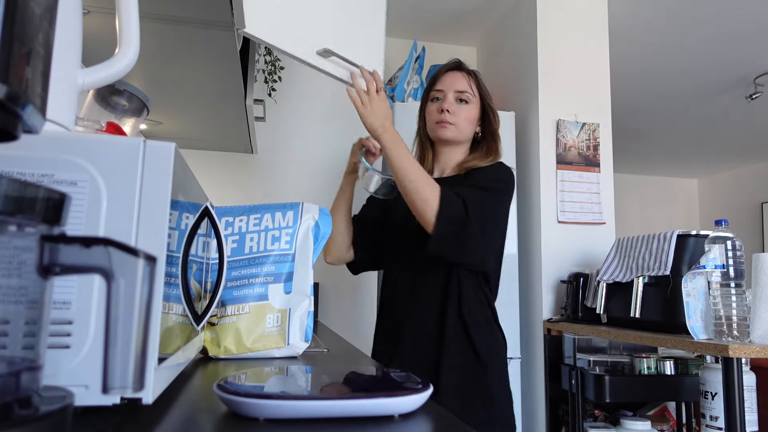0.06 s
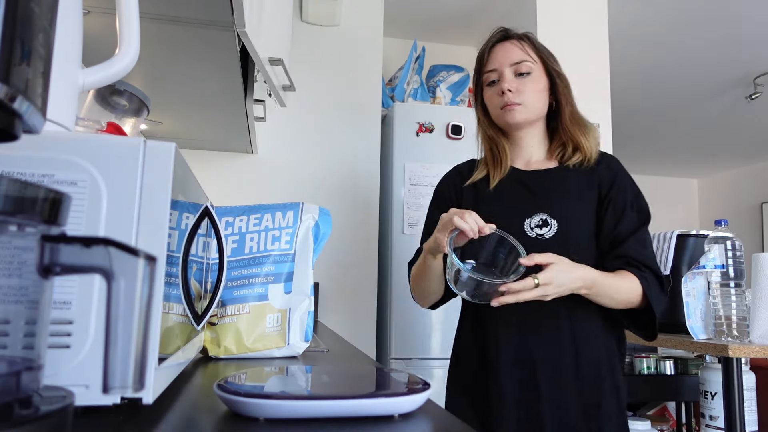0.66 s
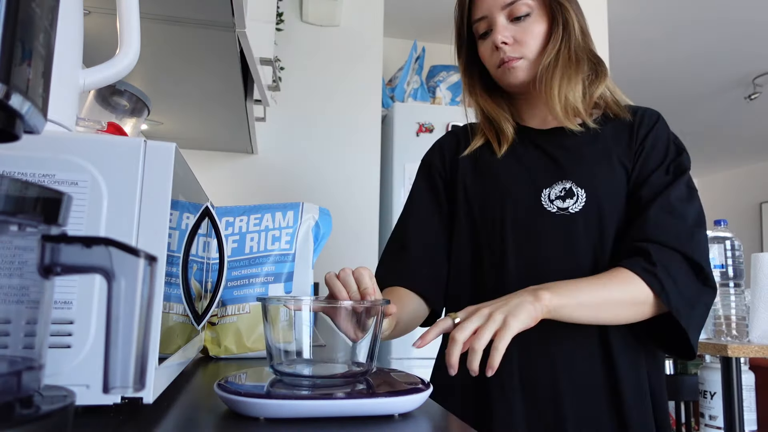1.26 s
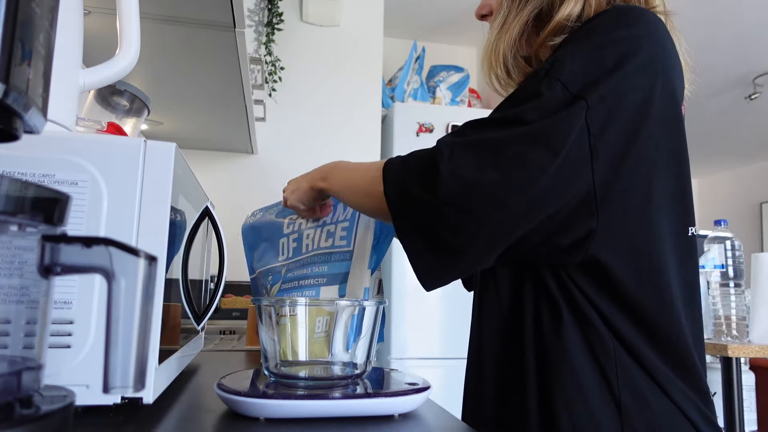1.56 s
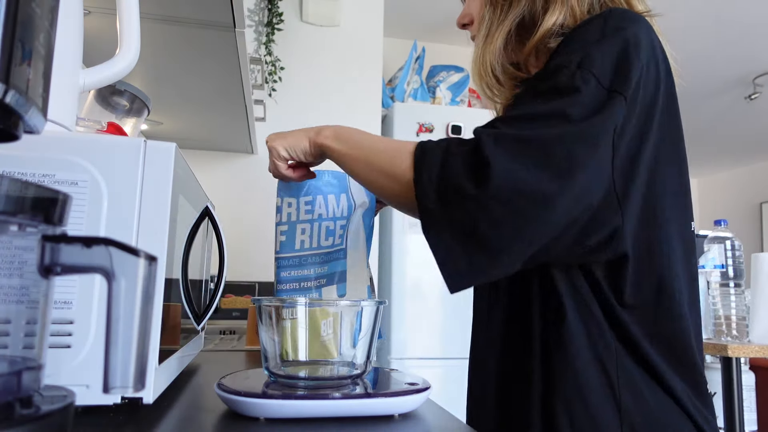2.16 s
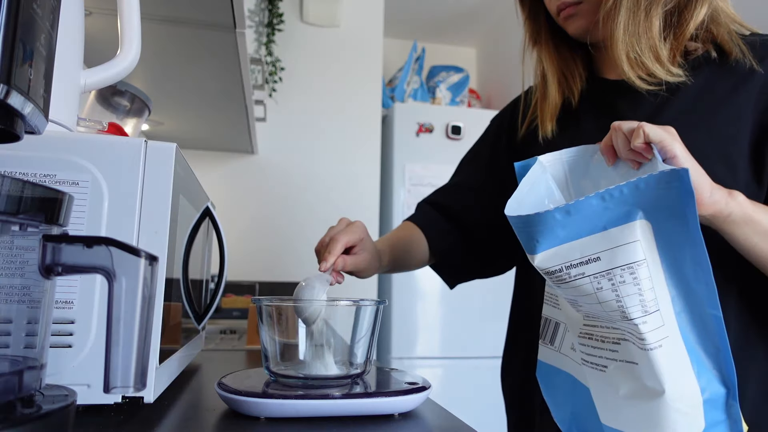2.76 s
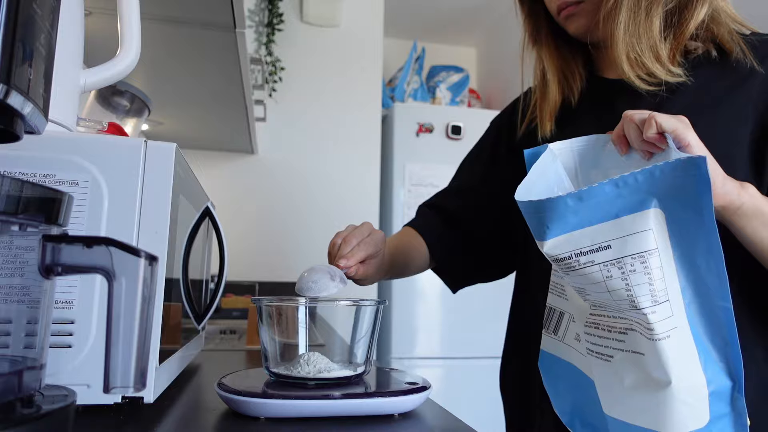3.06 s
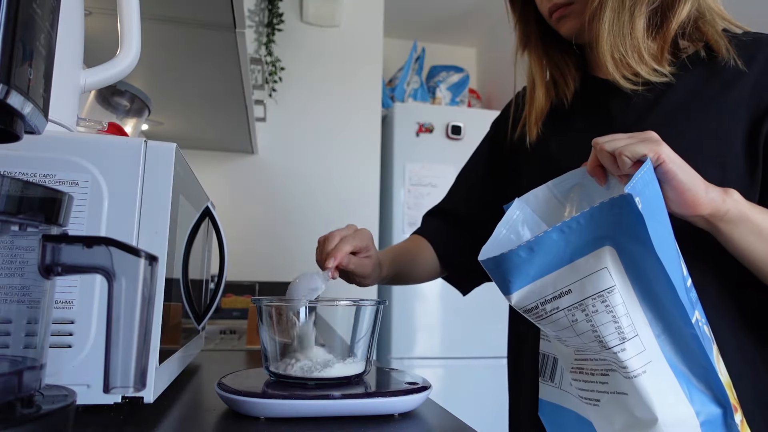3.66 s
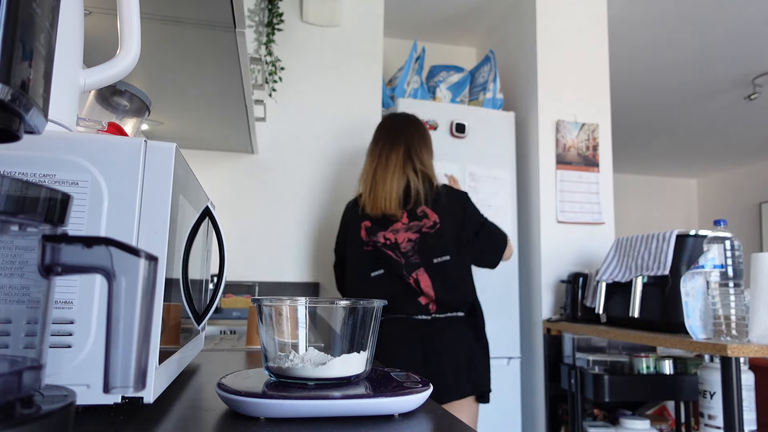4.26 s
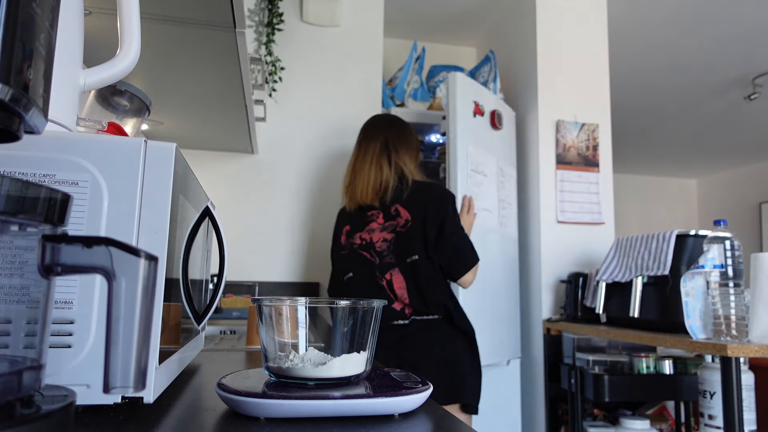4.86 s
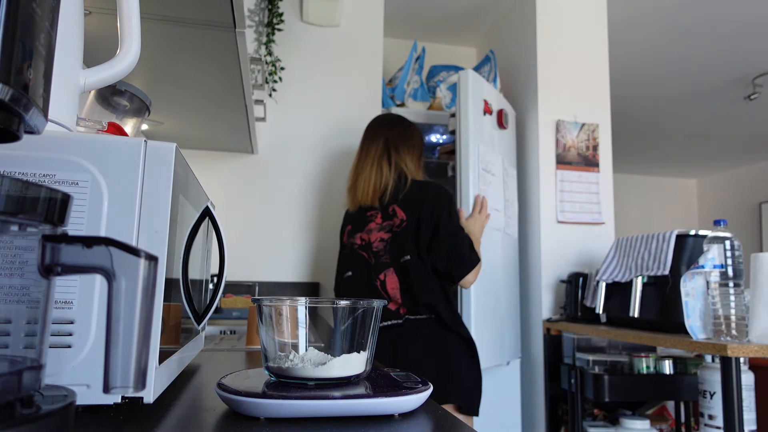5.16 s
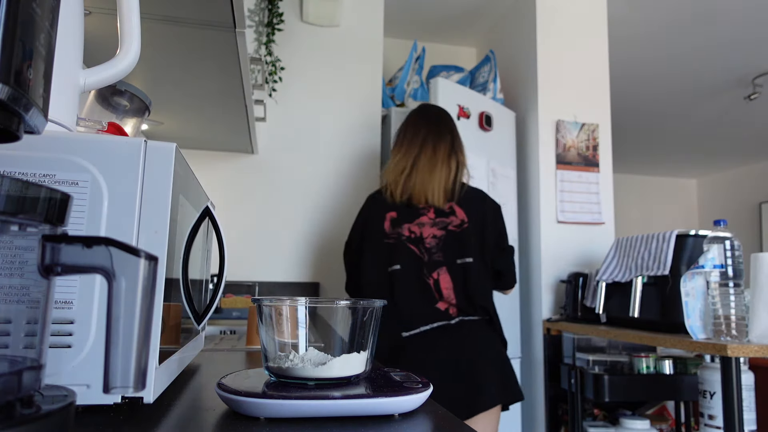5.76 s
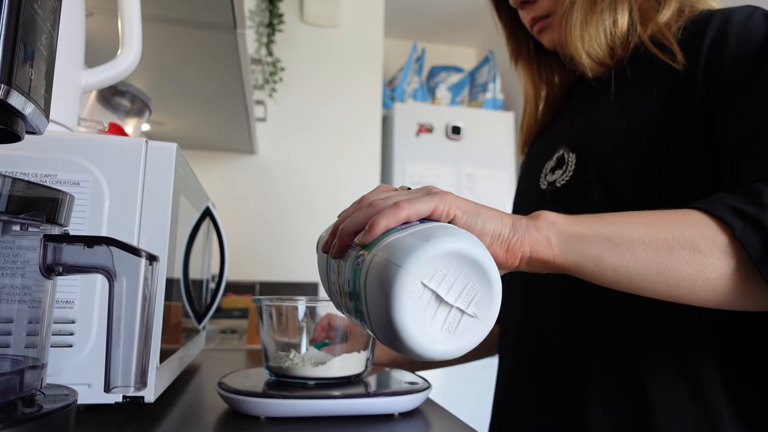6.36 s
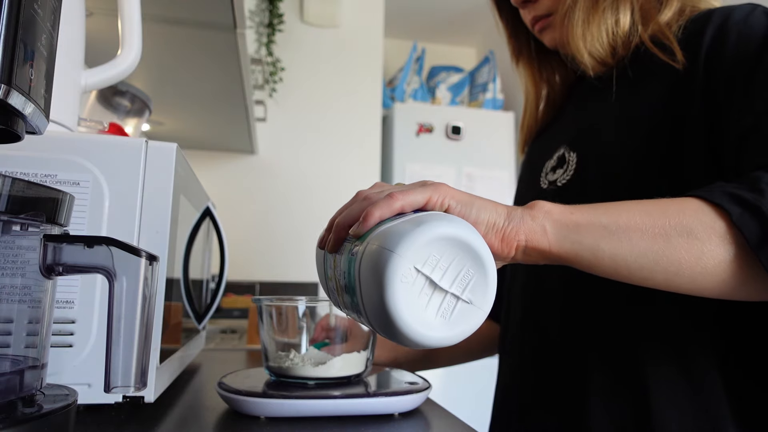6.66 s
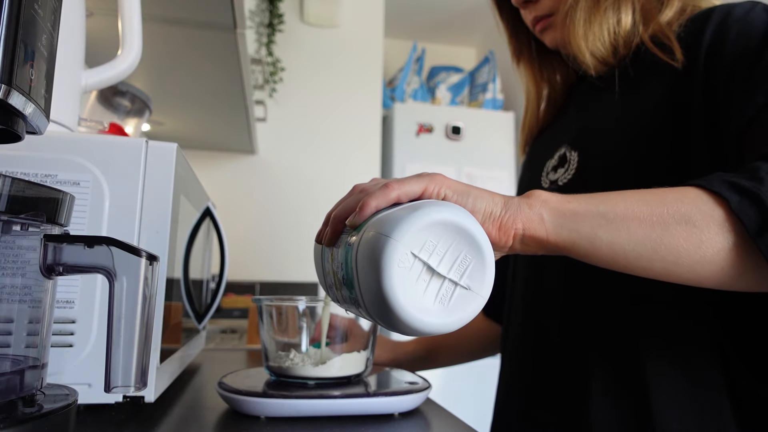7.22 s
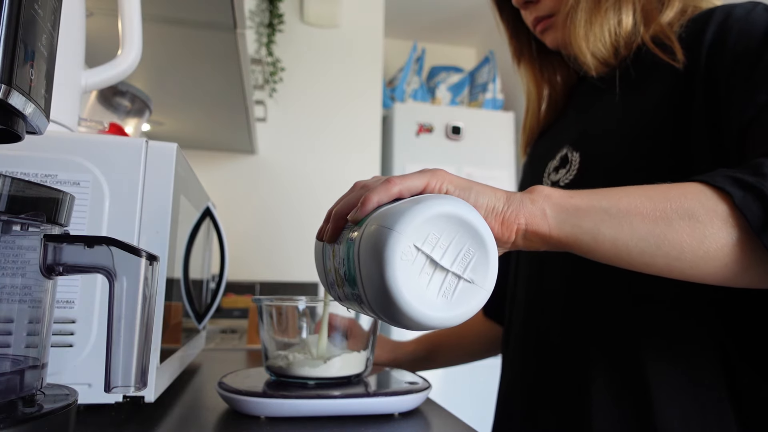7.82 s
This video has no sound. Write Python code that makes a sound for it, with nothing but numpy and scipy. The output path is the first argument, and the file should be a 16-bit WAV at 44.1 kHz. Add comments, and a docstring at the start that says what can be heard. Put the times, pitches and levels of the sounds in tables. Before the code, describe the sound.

A glass bowl clatters onto a scale, a plastic bag crinkles, powder is scooped, and a fridge door opens and shuts in a kitchen.

```python
"""A small tiled kitchen in six hard-cut segments, each with its own level of room tone.
Sleeves swish, doors bump and a glass bowl pings off its shelf, then clatters onto a scale. A stiff
plastic bag snaps and crinkles as it is hauled up. Powder hisses off a scoop that raps the bowl, and a
bird calls outside. A fridge is pulled open and shut, shelves rattling and cabinet rocking. Last, powder
creeps along a gently tipped tub while the bird calls again."""
import sys
import numpy as np
from scipy import signal
from scipy.fft import rfft, irfft
from scipy.io import wavfile

SR = 44100
rng = np.random.default_rng(int(sys.argv[2]) if len(sys.argv) > 2 else 0)


def master_out(mix):
    """Clip the mix to full scale and print it as 16-bit PCM to the path in sys.argv[1]."""
    frames = np.transpose(np.atleast_2d(mix))
    ceiling = np.clip(frames, -1, 1)
    pcm = np.round(ceiling * 32767).astype(np.int16)
    wavfile.write(sys.argv[1], SR, pcm)


N = 352260
TIME = np.arange(N) / SR

# Edges of the segments: t/s
CUTS = [-1, 1.456, 2.425, 3.192, 4.028, 5.857, 9]
# Tone of a small click, from fingertip or plastic: f/Hz, level/dB
CLICK_COLOUR = [(100, -23.5), (600, 13), (4000, 2.5), (10000, -2), (16000, -7)]


def undb(db):
    """Decibels to gain."""
    return 10 ** (np.asarray(db) / 20)


def unit(x):
    """Scale to rms 1."""
    return x / np.sqrt(np.mean(x ** 2))


def decay(t, t60):
    """Gain that falls 60 dB in t60 seconds."""
    return np.exp(-np.log(1000) * t / t60)


def at_hz(points, hz):
    """Read (f/Hz, value) rows on a log-frequency axis."""
    f, value = np.transpose(points)
    return np.interp(np.log(hz + 1), np.log(f), value)


def same_segment(s):
    """Gate that is open throughout the segment holding time s."""
    return np.searchsorted(CUTS, TIME) == np.searchsorted(CUTS, s)


def response(colour, modes=(), size=8192):
    """Impulse response of a body: a crack of the given colour, with damped modes ringing above it."""
    hz = np.fft.rfftfreq(size, 1 / SR)
    cepstrum = irfft(np.log(undb(at_hz(colour, hz))))
    cepstrum[1:size // 2] *= 2  # minimum phase: the energy comes up front
    cepstrum[size // 2 + 1:] = 0
    rings = sum(undb(db) * 1j * hz * width / (f * f - hz * hz + 1j * hz * width) for f, width, db in modes)
    return irfft(np.exp(rfft(cepstrum)) * (1 + rings))


def through(x, ir):
    """Pass a sound through an impulse response."""
    return signal.oaconvolve(x, ir)[:len(x)]


def soft_contact(x, hz, edge=0.035):
    """A longer contact pushes less treble into what it hits; a little of its sharp edge remains."""
    return signal.sosfilt(signal.butter(2, min(hz, .45 * SR), fs=SR, output="sos"), x) + edge * x


def buckle(x, hz, q=1.46, crack=0.13):
    """A panel flexes and rings for a few cycles; small stiff panels crack more sharply."""
    ring = signal.lfilter(*signal.iirpeak(min(hz, .4 * SR), q, fs=SR), x)
    return ring + crack * min(hz / 4000, 1) ** 2 * x


def light_touch(x, hz, q=2.1):
    """A light touch sounds only in a narrow band."""
    band = signal.iirpeak(min(hz, .4 * SR), q, fs=SR)
    return signal.lfilter(*band, signal.lfilter(*band, x))


def blows(rows, body, contact, rattle_db, size=16384):
    """Sharp hits, each with a rattle that falls 30 dB in its time. Rows: t/s, level/dB, f/Hz, rattle/s."""
    out, t = np.zeros(N + size), np.arange(size) / SR
    for s, db, hz, rattle_s in rows:
        push = rng.standard_normal(size) * decay(t, 2 * rattle_s) * undb(rattle_db)
        push[0] = 1
        hit = through(contact(push, hz), body)
        hit *= np.sqrt(SR / 100 / np.sum(hit ** 2))  # level is the energy spread over 10 ms
        until_cut_s = min(cut for cut in CUTS if cut > s) - s
        gate = np.clip((until_cut_s - t) / .004 - 2, 0, 1)
        start = max(int(s * SR), 0)
        out[start:start + size] += undb(db) * hit * gate
    return out[:N]


def flurry(spells, low_hz, high_hz, rattle_s, edge_db, count):
    """Rows of blows at uneven times and mixed pitches, strongest in the middle of each spell."""
    rows = []
    for s, length, db in spells:
        along = (np.arange(count) + rng.random(count)) / count
        pitches = rng.permutation(np.geomspace(low_hz, high_hz, count))
        for u, hz in zip(along, pitches):
            rows.append((s + u * length, db + edge_db * (2 * u - 1) ** 2, hz, rattle_s))
    return rows


def grains(colour, per_s, spread_db, bed, modes=()):
    """Friction: countless tiny slips of unequal size over a smooth bed of hiss."""
    sizes = undb(spread_db * np.minimum(rng.exponential(size=N), 5))
    slips = (rng.random(N) < per_s / SR) * sizes * rng.choice([-1, 1], N)
    friction = unit(slips) + bed * rng.standard_normal(N)
    return unit(through(friction, response(colour, modes)))


def strokes(rows, attack_s, t60):
    """Envelope of movements that build up, hold until their length is over and die away."""
    return sum(undb(db) * np.clip((TIME - s) / attack_s, 0, 1)
               * decay(np.maximum(TIME - s - length, 0), t60) for s, length, db in rows)


def stereo(mid, side):
    """Two close microphone ports hear nearly the same bass and a slightly different treble."""
    side = through(side, response([(700, -14), (5000, -6.5)]))
    return np.array([mid + side, mid - side])


def room_tone():
    """Steady murmur of the house and the street outside."""
    # Tone of the murmur: f/Hz, level/dB
    colour = [(18, -73.5), (30, -40), (100, -6), (194, -6), (227, -6.5), (512, -8), (822, -12), (1280, -12),
              (1430, -11.5), (2980, -17), (4420, -20), (13700, -28.5), (16000, -27)]
    mid, side = (unit(through(rng.standard_normal(N), response(colour))) for _ in range(2))
    return stereo(mid, side)


def sleeve_swishes():
    """Sleeve and shirt rub, loudest in mid-movement."""
    # Arm movements: middle t/s, length/s, level/dB
    sweeps = [(.15, .6, -65.5), (.58, 0.072, -60), (.87, 0.16, -66.5), (1.15, 0.43, -68),
              (2.81, .14, -56.5), (4.04, 0.034, -36.5), (4.24, 0.046, -38), (4.54, 0.43, -37),
              (4.91, 0.073, -45), (5.09, 0.096, -33.5), (5.48, 0.15, -38.5), (5.75, 0.24, -47)]
    # Bright hiss of cloth: f/Hz, level/dB
    colour = [(100, -24), (1000, -21), (3000, -1), (5000, -1), (8500, -1.5), (12000, -5), (16000, -8.5)]
    motion = sum(undb(db) * np.exp(-2 * ((TIME - s) / length) ** 2) * same_segment(s)
                 for s, length, db in sweeps)
    return motion * grains(colour, per_s=3500, spread_db=3.0, bed=0.31)


def finger_ticks():
    """Fingers tick lightly on the glass and the tub."""
    # Touches: t/s, level/dB, pitch f/Hz, rattle/s
    touches = [(.03, -57.5, 1930, 0.075), (.292, -55, 2270, 0.043), (7.10, -59, 5500, .02),
               (7.404, -59.5, 4500, .008), (7.406, -59, 9000, .008), (7.678, -57, 11500, 0.05),
               (7.825, -56.5, 4000, .06)]
    return blows(touches, response(CLICK_COLOUR), light_touch, rattle_db=-20.5)


def cabinet_thuds():
    """Doors and worktop bump dully; the fridge cabinet rocks as its door comes free and as it closes."""
    # Bumps: t/s, level/dB, pitch f/Hz, rattle/s
    bumps = [(.035, -50, 137, 0.035), (.30, -49.5, 404, .08), (.35, -49, 125, 0.061),
             (.59, -54, 120, 0.053), (1.285, -31, 113, 0.15), (5.25, -41, 105, .11), (5.40, -37, 129, 0.13)]
    # Spells of rocking: t/s, length/s, level/dB
    rocks = [(4.1, .22, -26.5), (5.385, .18, -30.5)]
    # Tone of a thud: f/Hz, level/dB
    colour = [(25, -42.5), (60, -8), (110, -7), (400, -3), (900, -0.5), (4000, -28)]
    # Cabinet resonances: f/Hz, width/Hz, level/dB
    modes = [(138, 16, 1.1), (256, 22, 3.5), (372, 20, 1.8)]
    rocking = flurry(rocks, low_hz=133, high_hz=435, rattle_s=0.074, edge_db=-8, count=8)
    return blows(bumps + rocking, response(colour, modes), buckle, rattle_db=-19)


def glass_ping(s=0.037, hz=2019, db=-51, t60=0.32, rise_s=0.0028):
    """The bowl sings briefly as it slides off the shelf."""
    t = np.maximum(TIME - s, 0)
    return undb(db) * np.sin(2 * np.pi * hz * t) * (1 - np.exp(-t / rise_s)) * decay(t, t60)


def bowl_clatter():
    """The glass bowl lands on the scale in a quick run of knocks that ring both."""
    # Knocks: t/s, level/dB, brightness f/Hz, rattle/s
    knocks = [(1.2603, -21, 8300, 0.054), (1.275, -19.5, 10000, 0.29), (1.292, -20.5, 2630, 0.0055),
              (1.300, -19.5, 3500, 0.051), (1.320, -23.5, 6040, 0.11), (1.340, -20.5, 4500, 0.026),
              (1.3785, -19.5, 2500, 0.0024), (1.4132, -23.5, 2600, 0.0035), (1.435, -22, 4300, 0.0056),
              (1.441, -17.5, 1190, 0.014)]
    # Tone of the impact: f/Hz, level/dB
    colour = [(40, -21), (200, -16), (430, -1), (1500, -1), (3200, -5), (8000, -6.5), (16000, -15)]
    # Resonances of bowl and scale: f/Hz, width/Hz, level/dB
    modes = [(105, 25, 10.5), (527, 87, 5), (950, 41, -5), (1610, 120, -13), (2430, 26, 5.5),
             (4130, 26, -11), (6190, 130, 0.5)]
    return blows(knocks, response(colour, modes), soft_contact, rattle_db=-13)


def plastic_bag():
    """Stiff panels snap and crinkle in the grip, then buckle at random under the bag's full weight."""
    # Snaps: t/s, level/dB, panel f/Hz, rattle/s
    snaps = [(1.5243, -32, 4100, 0.0044), (1.610, -39, 4100, .005), (1.6328, -30, 9300, 0.041),
             (1.7098, -28, 1370, 0.011), (1.718, -27.5, 3600, .024), (1.7845, -34, 2030, 0.0074),
             (1.787, -28, 7150, 0.033), (1.8405, -27.5, 5450, 0.005)]
    # Spell of buckling: t/s, length/s, level/dB
    under_load = [(1.9, .39, -29.5)]
    # The grip, then the haul: t/s, length/s, level/dB
    pulls = [(1.68, .13, -37.5), (1.835, 0.45, -29)]
    # Tone of the crinkle: f/Hz, level/dB
    colour = [(35, -55), (60, -19.5), (176, -14.5), (268, -9), (315, -9.5), (767, 0.5), (882, -22.5),
              (1140, -1.5), (2300, -6), (3420, -4.5), (11500, -12.5), (16000, -19.5)]
    buckling = flurry(under_load, low_hz=530, high_hz=4500, rattle_s=.014, edge_db=-1, count=12)
    cracks = blows(snaps + buckling, response(CLICK_COLOUR), buckle, rattle_db=-21)
    crinkle = grains(colour, per_s=800, spread_db=3.0, bed=0.36)
    return cracks + strokes(pulls, attack_s=0.05, t60=.12) * crinkle


def powder_slides():
    """Powder slips off the scoop in a soft hiss that trails away."""
    # Slides: t/s, length/s, level/dB
    slides = [(2.42, .06, -48.5), (2.87, .06, -59)]
    # Tone of the powder: f/Hz, level/dB
    colour = [(35, -39.5), (60, -13.5), (156, -10.5), (212, 5), (250, -5.5), (666, -16), (1910, -9.5),
              (3340, -16), (7940, -28.5), (14900, -29), (16000, -35.5)]
    return strokes(slides, attack_s=.015, t60=0.96) * grains(colour, per_s=1700, spread_db=3.5, bed=0.85)


def scoop_raps():
    """The scoop raps the bowl cleanly, with hardly any rattle."""
    # Taps: t/s, level/dB, brightness f/Hz, rattle/s
    taps = [(2.928, -37.5, 1100, 0.012), (2.9477, -16, 9000, 0.016), (3.3948, -42.5, 950, 0.011)]
    # Tone of the impact: f/Hz, level/dB
    colour = [(60, -33), (250, -15.5), (550, -5), (1400, -5), (2200, -1.5), (4000, -5), (7000, -8.5),
              (11000, -10.5), (16000, -10.5)]
    # Scoop resonances: f/Hz, width/Hz, level/dB
    modes = [(603, 60, 4), (980, 130, 3.5), (1300, 110, 5), (1550, 130, 4), (3050, 250, 0), (3750, 300, 5)]
    return blows(taps, response(colour, modes), soft_contact, rattle_db=-31)


def whistles(notes, length_s, first_hz, last_hz, trill, wobble_per_s=420):
    """Thin whistles that slide down, trilling unevenly until they settle on their last pitch."""
    out = np.zeros(N)
    wobble = np.interp(TIME * wobble_per_s, np.arange(N), rng.standard_normal(N))
    along = np.linspace(0, 1, int(length_s * SR))
    envelope = np.sqrt(2 * np.abs(np.sin(np.pi * along)))
    for s, db in notes:
        note = slice(int(s * SR), int(s * SR) + len(along))
        glide_hz = last_hz + (first_hz - last_hz) * (1 - along) ** 2.3
        hz = glide_hz * (1 + trill * (1 - along) ** 2 * wobble[note])
        out[note] += undb(db) * envelope * np.sin(2 * np.pi * np.cumsum(hz) / SR) * same_segment(s)[note]
    return out


def bird():
    """A bird outside repeats one falling call, with short high pips in between."""
    # Calls: t/s, level/dB
    calls = [(3.085, -47.5), (6.235, -58.5), (6.569, -62), (7.005, -65.5), (7.725, -62)]
    # Pips: t/s, level/dB
    pips = [(6.145, -62), (6.65, -68.5), (7.26, -66), (7.895, -63.5)]
    return (whistles(calls, length_s=.135, first_hz=5100, last_hz=3715, trill=.13)
            + whistles(pips, length_s=.06, first_hz=5800, last_hz=5660, trill=0.077))


def fridge_door(lag_s=.032, jitter_s=.004, shelf_db=-5, shelf_hz=850, shelf_rattle_s=0.025):
    """The door opens, swings and shuts; after each knock its loaded shelves fall back, softer and duller."""
    # Door knocks: t/s, level/dB, brightness f/Hz, rattle/s
    knocks = [(4.034, -30.5, 7000, .05), (4.060, -17, 6100, 0.0024), (4.0632, -20.5, 4900, 0.004),
              (4.148, -24.5, 2340, 0.028), (4.232, -24, 3000, 0.029), (4.404, -28, 6100, 0.063),
              (4.815, -41, 5000, 0.016), (4.878, -30, 1700, .02), (5.069, -23.5, 3600, 0.025),
              (5.157, -31.5, 2820, 0.024), (5.392, -26, 1580, 0.059), (5.450, -23.5, 2000, 0.063),
              (5.518, -24, 3240, .035)]
    # Tone of the impact: f/Hz, level/dB
    colour = [(40, -34), (200, -11.5), (430, -4.5), (850, -6.5), (2000, -3.5), (4000, -9.5), (8000, -10.5),
              (16000, -11)]
    # Door resonances: f/Hz, width/Hz, level/dB
    modes = [(383, 17, -1.5), (483, 98, -2), (556, 100, 6.5), (1205, 45, -1.5), (1700, 79, -3),
             (2584, 39, 0.5)]
    rebounds = [(s + lag_s + jitter_s * rng.standard_normal(), db + shelf_db, shelf_hz, shelf_rattle_s)
                for s, db, _, _ in knocks]
    return blows(knocks + rebounds, response(colour, modes), soft_contact, rattle_db=-11.5)


def tipped_tub():
    """Powder creeps along the tub, coloured by its hollow."""
    # The flow eases, then grows as the tub tips further: t/s, level/dB
    flow = [(5.86, -69), (6.4, -69.5), (6.8, -75.5), (7.6, -68), (8, -61)]
    # Tone of the creeping powder: f/Hz, level/dB
    colour = [(100, -13), (500, -2), (1200, 1), (3500, -17), (9000, -18), (16000, -11)]
    # Resonances of the hollow: f/Hz, width/Hz, level/dB
    modes = [(444, 66, 2), (990, 250, 7.6), (1900, 160, 9.8)]
    s, db = np.transpose(flow)
    swell = undb(np.interp(TIME, s, db)) * (TIME >= s[0]) * (TIME <= s[-1])
    return swell * grains(colour, per_s=5100, spread_db=4.0, bed=0.67, modes=modes)


def kitchen_reverb(build_s=0.0019, early=1.83, early_s=0.0082):
    """Stereo tail of the hard room: strong first echoes off the worktop, then an even decay."""
    # Decay of the room by band: f/Hz, t60/s
    bands = [(100, 0.54), (500, 0.49), (1500, 0.63), (4000, 0.66), (9000, 0.54), (16000, 0.28)]
    t, hz = np.arange(SR) / SR, np.fft.rfftfreq(SR, 1 / SR)
    noise, tail = rfft(rng.standard_normal((2, SR))), 0
    for band_hz, t60 in bands:
        share = at_hz([(f, f == band_hz) for f, _ in bands], hz)
        tail = tail + irfft(noise * share) * decay(t, t60)
    tail = tail * (1 - np.exp(-t / build_s)) * (1 + early * np.exp(-t / early_s))
    return stereo(*(tail / np.sqrt(np.sum(tail[0] ** 2))))


def place(x, room_db, pan_db):
    """Close surfaces smear each click without colouring it; returns left, right and reverb send."""
    hz = np.fft.rfftfreq(2048, 1 / SR)
    delays = np.exp(-2j * np.pi * hz * np.array([[5], [13], [29]]) / SR)
    allpass = irfft(np.prod((delays - .66) / (1 - .66 * delays), axis=0))
    return through(x, allpass) * undb([[pan_db / 2], [-pan_db / 2], [room_db]])


def scene():
    """All sources in the room; every segment ends abruptly and takes its echoes with it."""
    # Room tone in each segment: level/dB
    tone_levels = [-60.5, -59.5, -51.5, -62.5, -42.5, -63]
    tail, tone = kitchen_reverb(), room_tone()
    mix = (place(sleeve_swishes(), room_db=-3.5, pan_db=0.5)
           + place(finger_ticks() + glass_ping() + powder_slides() + tipped_tub(), room_db=-2, pan_db=1.2)
           + place(cabinet_thuds(), room_db=3.5, pan_db=-2.6)
           + place(bowl_clatter(), room_db=-4, pan_db=0.5)
           + place(plastic_bag(), room_db=-3.5, pan_db=0.5)
           + place(scoop_raps(), room_db=-1.5, pan_db=0.5)
           + place(fridge_door(), room_db=3.5, pan_db=-1))
    direct, send = mix[:2], mix[2] + bird()  # the bird is heard only by way of the walls
    out, fade_s = np.zeros((2, N)), .007
    for start, end, tone_db in zip(CUTS, CUTS[1:], tone_levels):
        gate = np.clip(np.minimum(TIME - start, end - TIME) / fade_s + .5, 0, 1)
        on = gate > 0
        echoes = np.array([through(send[on] * (gate[on] == 1), side) for side in tail])
        out[:, on] += gate[on] * (direct[:, on] + echoes + undb(tone_db) * tone[:, on])
    return out


def record(dry, low_hz=45, top_hz=16000):
    """The microphone drops the deepest bass and the top is cut steeply; the loudest peaks come out softly
    rounded."""
    thin = signal.sosfilt(signal.butter(2, low_hz, "high", fs=SR, output="sos"), dry)
    rounded = 1.1 * np.tanh(thin / 1.1)
    return signal.sosfilt(signal.ellip(10, .2, 70, top_hz, fs=SR, output="sos"), rounded)


dry = scene()
out = record(dry)
master_out(out)
```